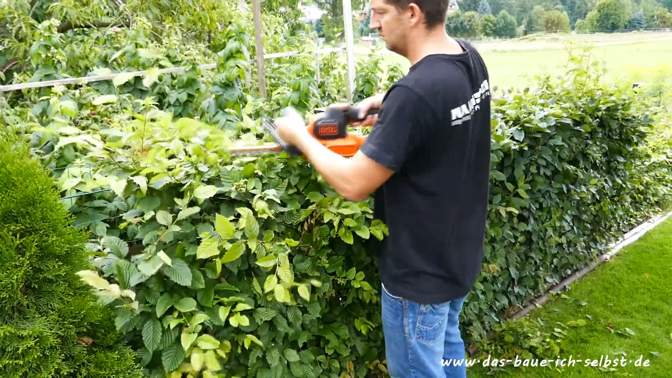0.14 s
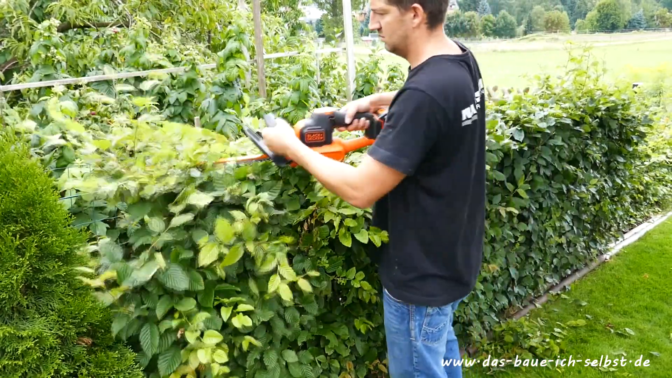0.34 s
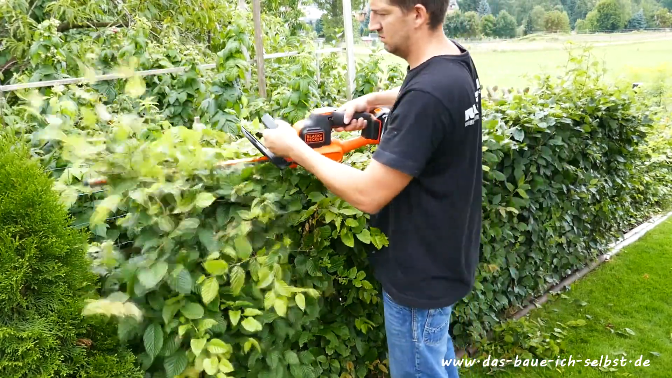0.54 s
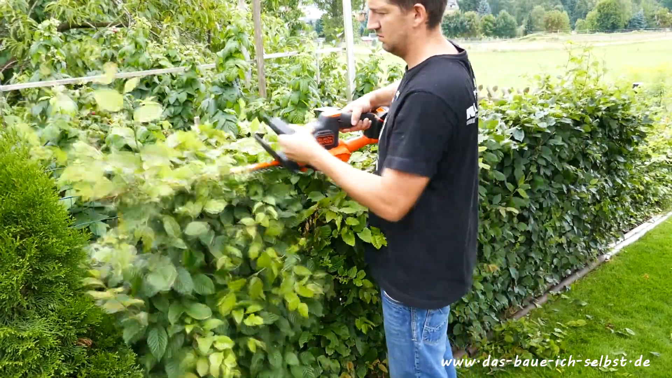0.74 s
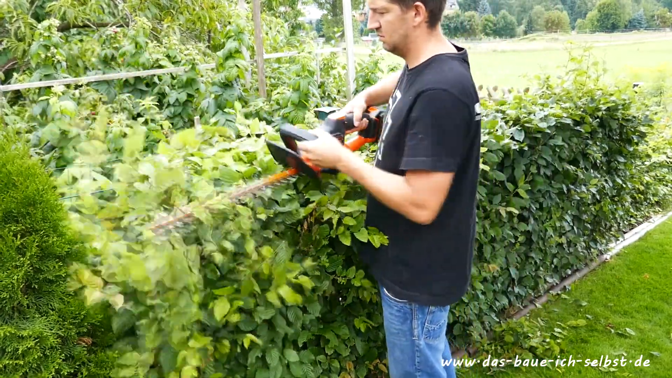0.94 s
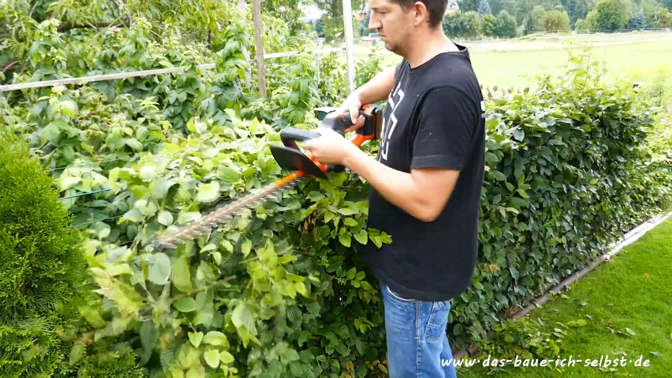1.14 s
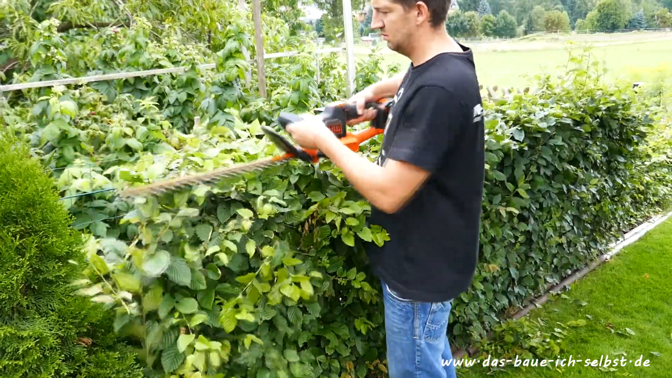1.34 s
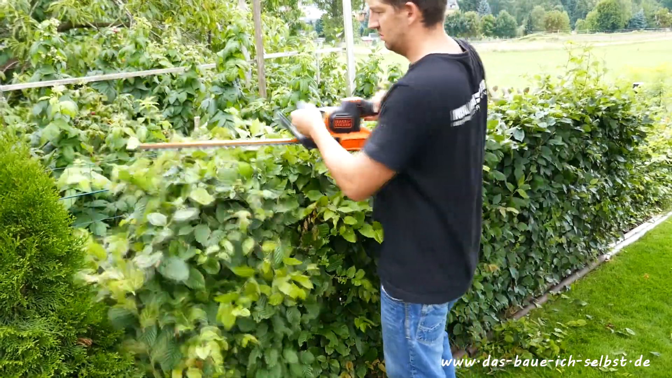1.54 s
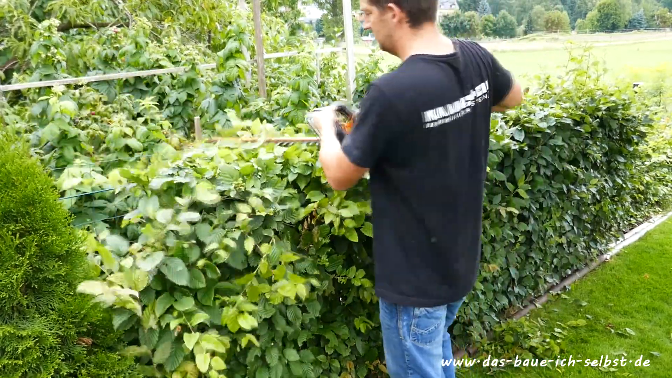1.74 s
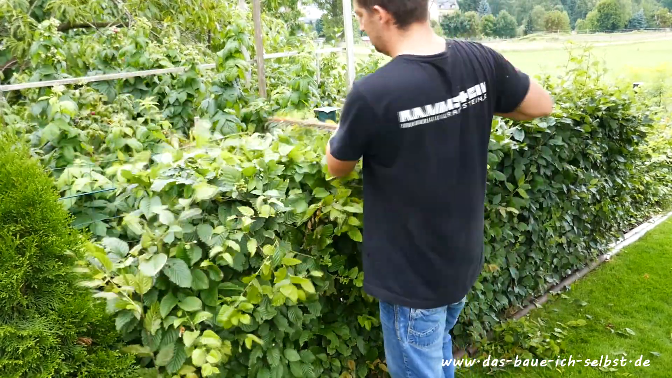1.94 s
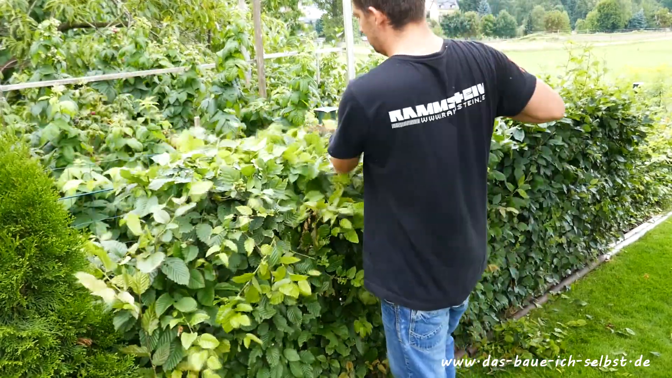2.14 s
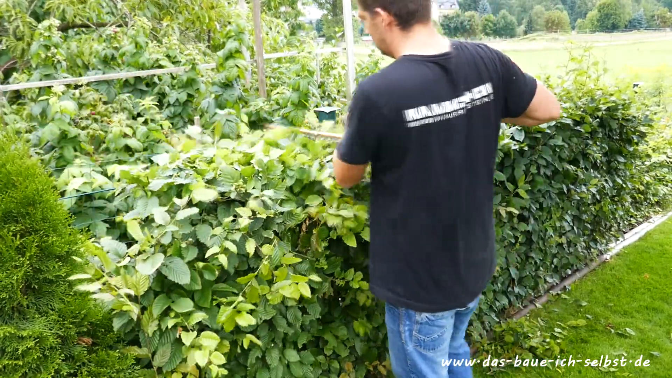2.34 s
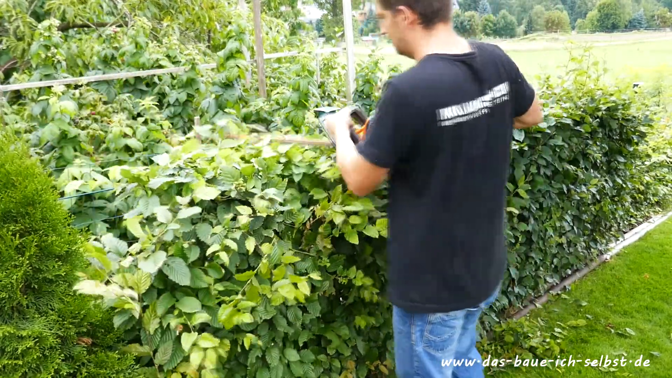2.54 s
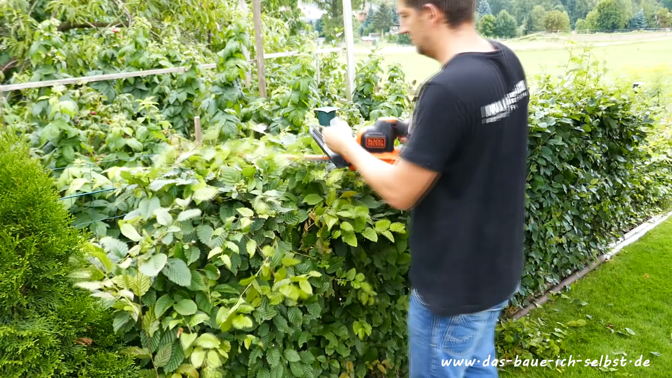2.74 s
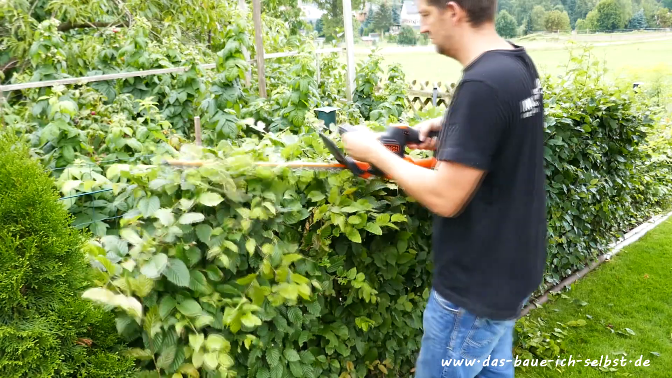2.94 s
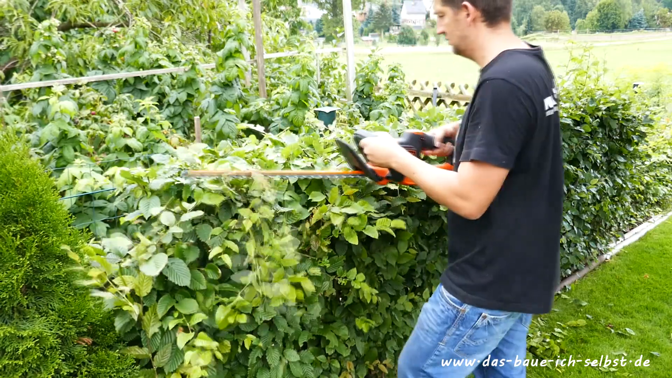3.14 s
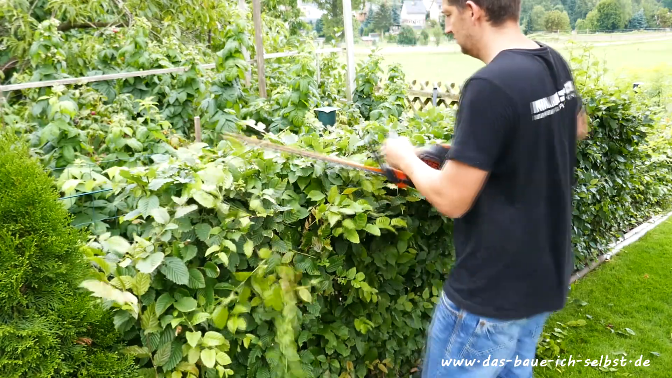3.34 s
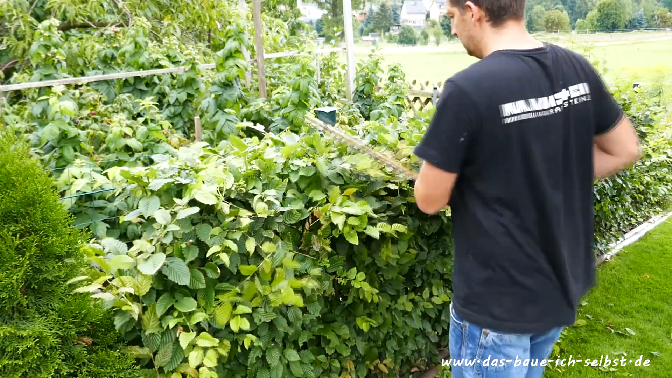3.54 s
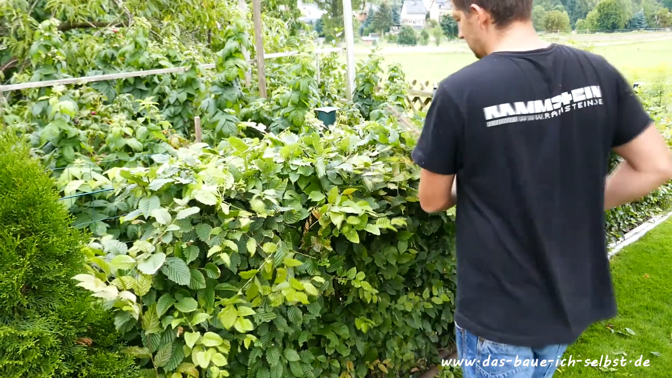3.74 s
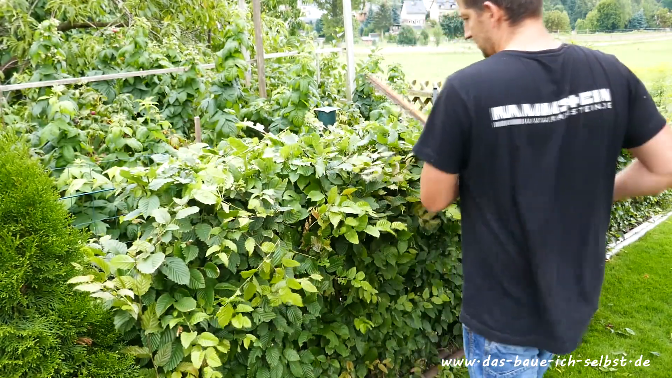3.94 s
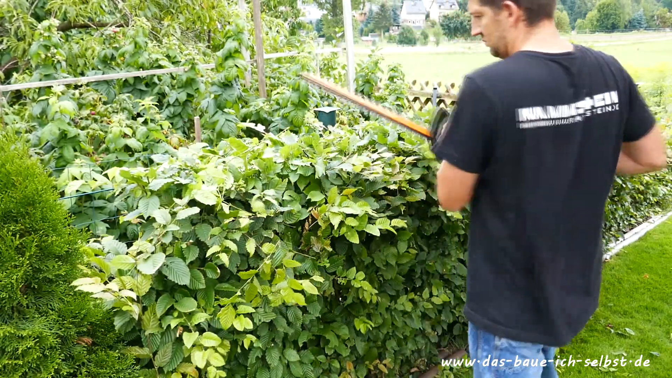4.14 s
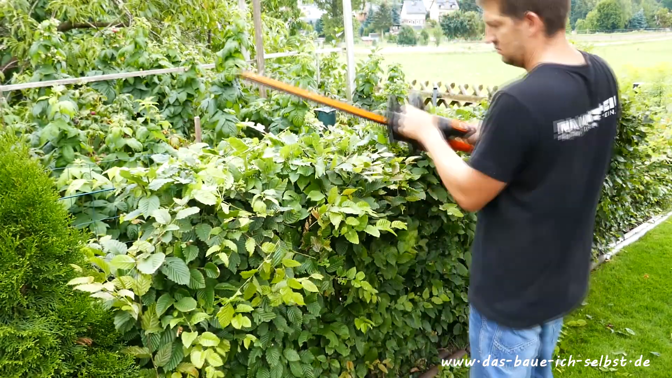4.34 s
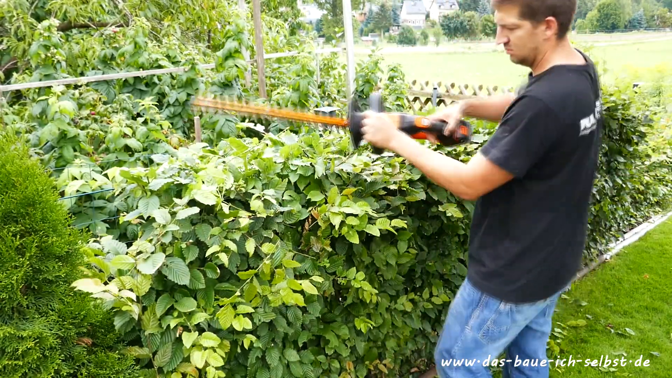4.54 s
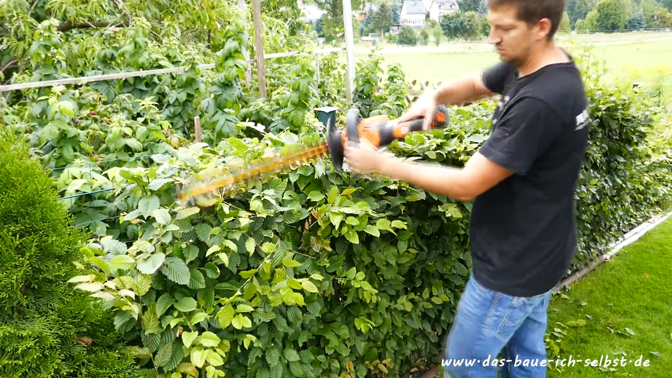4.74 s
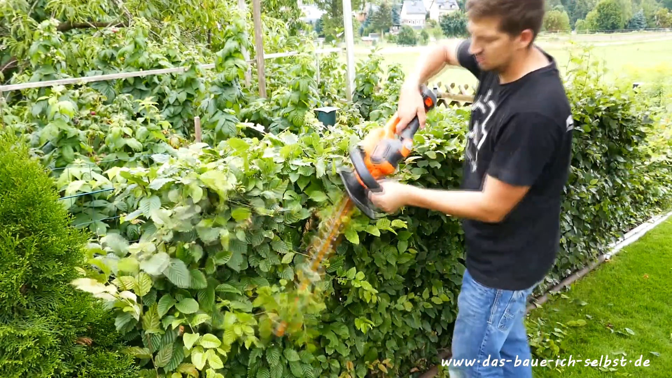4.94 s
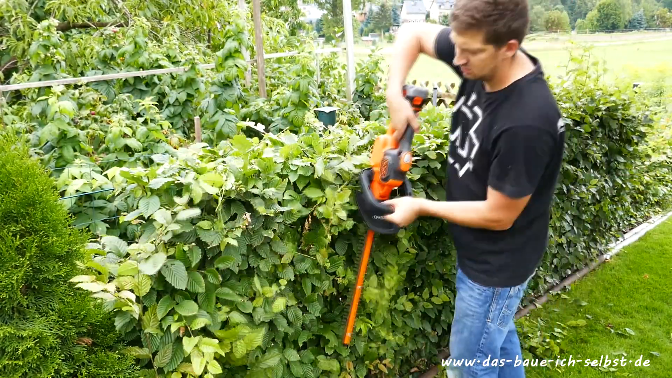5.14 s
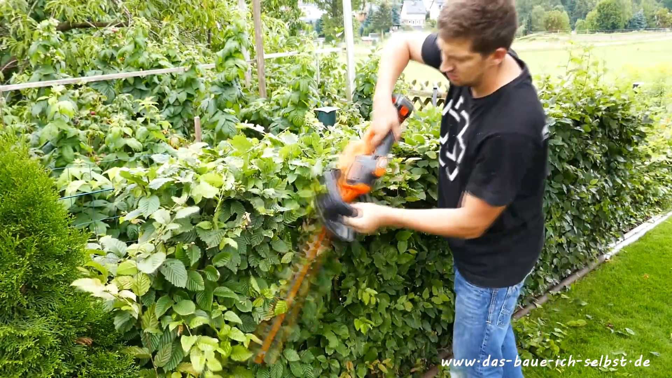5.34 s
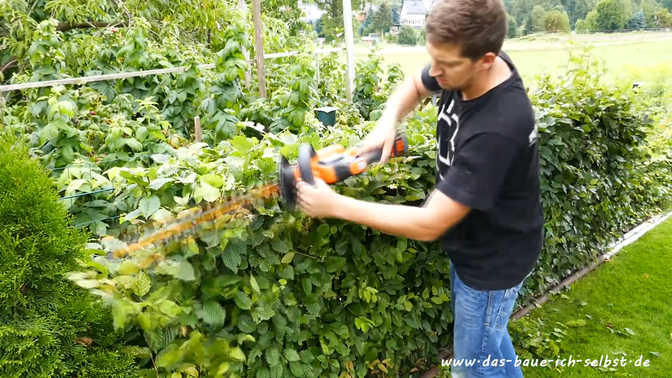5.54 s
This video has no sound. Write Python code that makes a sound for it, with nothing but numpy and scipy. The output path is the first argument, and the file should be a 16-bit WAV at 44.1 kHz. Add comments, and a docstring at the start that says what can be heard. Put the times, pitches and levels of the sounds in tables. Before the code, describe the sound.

A battery hedge trimmer is already running at full speed, close and dry in an open garden. Its reciprocating drive makes a rapid, grainy rattle of hollow plastic and gears, about 46 strokes a second, beneath a bright rasp of steel blades. Speed sags slightly around 0.5-0.8 s as it bites. Low wind thuds bump the microphone at 0.15-0.45 s and again near 0.8 s. Twigs crack and leaves crackle irregularly, with a leafy tear near 2.5 s. Tone shifts as the tool swings; from about 3.5 s it is duller, slowing slightly. At 4.12 s the drive winds down within a tenth of a second, with small clacks, leaving faint air and a distant engine's low drone. After a click near 4.28 s it restarts at 4.31 s with a short, rough, nasal bark, then rattles brightly, with frequent twig snaps and shredding leaves until cut off at about 5.6 s.

```python
"""Hedge trimmer in a garden

A cordless hedge trimmer works along a hedge, stops for a moment and starts again with a bark.
Impacts in the drive excite housing and gears; the steel blades scrape and ring; grain and noise bursts
make the leaves and twigs. The gardener's body shades the tool, echoes and foliage spread the sound,
and filtered noise gives gusts on the microphone and a garden wash with a distant engine."""
import sys
import numpy as np
from scipy import signal
from scipy.fft import rfft, irfft
from scipy.io import wavfile

SR = 44100
rng = np.random.default_rng(int(sys.argv[2]) if len(sys.argv) > 2 else 0)


def unload_audio(sound):
    """Save the sound as a 16-bit wav file, at the path given as the first command line argument."""
    columns = np.transpose(np.atleast_2d(sound))
    # keep every value between -1 and 1, then stretch to whole-number steps
    steps = np.round(np.clip(columns, -1, 1) * 32767)
    wavfile.write(sys.argv[1], SR, steps.astype(np.int16))


N = 246519
TIME = np.arange(N) / SR
PULL_S = 4.312  # the trigger is pulled again

# blade speed with the trigger held; it sags in thick growth and eases off before the stop:
# (time [s], speed [reversals per s])
SPEED = [(0, 46), (.3, 45.6), (.5, 43.6), (.74, 43), (.86, 45.6), (1.2, 46), (1.55, 45.4), (2.0, 46.2),
         (2.5, 46), (2.85, 45.4), (3.15, 46.7), (3.48, 45.7), (3.65, 43.2), (3.88, 43), (3.94, 39.6),
         (4.04, 35.5), (4.13, 35), (4.3, 46)]
# colour of the rattling housing: (frequency [Hz], level [dB per Hz])
HOUSING = [(50, -51), (120, -40.5), (200, -14), (290, -12.5), (355, -1.5), (450, -3.5), (580, -2.5),
           (740, -1.5), (860, 1), (1150, 0.6), (1330, -0.5), (1480, -2.5), (1750, -7.5), (2400, -26.5)]
# colour of the gear clatter: (frequency [Hz], level [dB per Hz])
GEARS = [(100, -70), (1100, -47), (1650, -10), (2000, -3), (2400, 2), (2700, -1), (2950, -6), (3350, -5),
         (3950, -11), (4400, -10), (5000, -11), (5700, -38.5), (8000, -39)]
# colour of the scraping blades: (frequency [Hz], level [dB per Hz])
SCRAPE = [(100, -46), (3800, -31), (5300, 2), (6000, 0), (7100, -3.5), (8400, -0.5), (9900, -0.5),
          (11500, -0.5), (13000, -0.5), (14000, -4.5), (15000, -10), (16000, -6.5)]


def trimmer():
    """A crank drives the blades; play in the drive knocks at each reversal and rattles in between."""
    strokes = np.cumsum(speed()) / SR
    drive = drive_impacts(strokes)
    housing_gain, gears_gain, blades_gain = levels()
    gears = evened(coloured(drive, GEARS))
    body = housing_gain * housing(drive, strokes) + gears_gain * gears
    return body + blades(drive, strokes, blades_gain) + strains(drive) + motor(drive)


def drive_impacts(strokes):
    """Crank knocks, slapping blade teeth and fine grit, pressed harder at one point of each stroke."""
    knocks = impacts(strokes + .06 * wander(40), spread_db=2.5)
    # the outward and the return stroke knock with unequal force
    knocks = knocks * (1 + 0.21 * np.cos(np.pi * strokes))
    # the teeth slap past each other several times a stroke, never quite in step
    teeth = impacts(8 * strokes + .35 * wander(50), spread_db=1.15)
    load = gain_of(0.24 * np.cos(2 * np.pi * (strokes - .08)))
    crank = 0.32 * chatter(knocks, decay_s=0.0082)
    slaps = 0.7 * chatter(teeth, decay_s=0.0018)
    grit = 0.58 * grains(6500, spread_db=1.0)
    return load * evened(crank + slaps + grit)


def housing(drive, strokes, stuck_pace=.62):
    """The drive shakes the plastic housing; below stuck_pace of full speed its rattle fades away."""
    shaken = evened(coloured(drive, HOUSING))
    freedom = np.minimum(pace() / stuck_pace, 1) ** .5
    return evened(shaken + rattle(strokes)) * freedom


def rattle(strokes, bounces_per_stroke=3.6, loose_turns=.4, level_db=-7.5, flex_s=0.00029):
    """Loose parts bounce unevenly against the shell, whose modes bend a little as the grip flexes it."""
    # narrow modes of the plastic shell: (frequency [Hz], width of the first pass [Hz], level [dB])
    shell_modes = [(392, 27, -7.5), (462, 30, -4), (509, 45, -7.5), (631, 31, -4.5), (830, 60, -3),
                   (950, 34, -3), (1090, 56, -5), (1205, 54, -0.5), (1429, 44, -1), (2440, 110, -0.5),
                   (2665, 97, -1.5)]
    hits = impacts(bounces_per_stroke * strokes + loose_turns * wander(70), spread_db=2.5)
    hits = hits * rng.choice([-1, 1], N)
    shell = np.zeros(N)
    for hz, width, db in shell_modes:
        shell += gain_of(db) * ring(ring(hits, hz, width), hz, hz / 2)
    return gain_of(level_db) * np.interp(TIME - flex_s * wander(3), TIME, evened(shell))


def blades(drive, strokes, gain, waver_db=2.5):
    """Steel slides over steel and through foliage in uneven bites; the rubbing also makes it ring."""
    # ringing of the steel: (frequency [Hz], decay by 60 dB [s], mean level before a shared trim [dB])
    steel_modes = [(4380, .009, -7), (4900, .012, -9.5), (6266, .03, -22), (7631, .04, -22),
                   (7900, .02, -18), (9910, .012, -14), (10621, .025, -14), (10830, .02, -18),
                   (13599, .022, -15), (13850, .012, -18), (14836, .03, -19)]
    bites = gain_of(wander(27) + np.cos(2 * np.pi * strokes))  # about 1 dB each
    fine = 1.2 * grains(6000, spread_db=2.5)
    coarse = 0.49 * chatter(grains(120, spread_db=0), decay_s=0.0031)
    rub = bites * evened(0.42 * drive + fine + coarse)
    steel = np.zeros(N)
    for hz, t60, db in steel_modes:
        width = np.log(1000) / np.pi / t60
        steel += gain_of(db + waver_db * wander(8.0)) * ring(gain * rub, hz, width)
    return gain * evened(coloured(rub, SCRAPE)) + gain_of(-3.0) * np.std(gain * rub) * steel


def strains(drive):
    """As load and grip shift, one resonance or another of housing, gears or blades sings out."""
    # singing resonances: (time [s], length [s], frequency [Hz], half the width of each pass [Hz], level [dB])
    singing = [(-.05, 0.24, 1500, 45, -43), (.295, .04, 380, 60, -38), (0.098, 0.44, 2560, 220, -51.5),
               (0.575, 0.32, 2340, 260, -45.5), (.85, 0.37, 3380, 80, -54), (.9, .55, 4300, 130, -59),
               (.95, 0.49, 2560, 240, -49), (2.173, 0.14, 4330, 100.2, -57), (2.58, 0.16, 890, 61, -55),
               (2.87, 0.095, 1410, 45, -44), (3.1, .38, 2690, 130, -48), (3.54, 0.18, 3360, 80, -49.5),
               (3.78, 0.28, 488, 40, -56), (4.383, 0.055, 2260, 160, -37), (4.45, 0.55, 833, 69.6, -49.5),
               (4.52, .38, 1180, 60, -49), (5.0, 0.5, 1096, 50, -46.5), (5.03, 0.44, 2500, 260, -45),
               (2.02, .2, 14880, 110, -60), (1.95, .25, 10660, 130, -59), (2.37, .25, 13870, 200, -55),
               (3.25, 0.44, 10610, 80, -57), (3.3, .42, 14850, 80, -62), (4.48, .38, 13600, 100, -55)]
    out = np.zeros(N)
    for s, length, hz, half_width, db in singing:
        out += gain_of(db) * swell(s, length) * ring_twice(drive, hz, half_width * 2)
    return out


def motor(drive, hum_cycles_per_stroke=7.6):
    """The rotor's wavering hum and the low thrum of the rattling drive, both following the speed."""
    # lows bending round the gardener as the tool is turned, at full speed:
    # (time [s], hum level [dB], thrum level [dB])
    aim = [(0, -54, -56), (.3, -43, -52.5), (.7, -50, -54), (1.051, -47.5, -62.5), (1.8, -56, -56.5),
           (2.3, -52, -54.5), (2.88, -42, -52.5), (3.1, -51.5, -59.5), (3.401, -53, -59), (3.6, -56, -54.5),
           (3.85, -54, -56), (3.94, -43, -54), (4.04, -57, -51), (4.4, -62, -69), (4.6, -52, -65),
           (5.6, -52.5, -62)]
    # colour of the thrum: (frequency [Hz], level [dB per Hz])
    thrum_colour = [(70, -30.5), (130, -19), (180, 1), (260, 3), (330, -6.5), (480, -14), (900, -63)]
    s, hum_db, thrum_db = np.transpose(aim)
    hum_gain = gain_of(np.interp(TIME, s, hum_db))
    thrum_gain = gain_of(np.interp(TIME, s, thrum_db))
    turns = np.cumsum(hum_cycles_per_stroke * speed()) / SR + .025 * wander(10)
    hum = evened(np.cos(2 * np.pi * turns) * (1 + .25 * wander(6)))
    thrum = evened(coloured(drive, thrum_colour))
    return pace() ** 2 * (hum_gain * hum + thrum_gain * thrum)


def speed(release_s=4.123, coast_s=.042, stall_s=.11, spin_up_s=.011):
    """Reversals per second: the drive coasts when the trigger is let go and spins up fast when pulled."""
    since = np.maximum(TIME - release_s, 0)
    friction = np.maximum(1 - (since / stall_s) ** 3, 0)  # dead stop stall_s after the release
    coasting = np.exp(-since / coast_s) * friction
    spinning_up = 1 - np.exp(-np.maximum(TIME - PULL_S, 0) / spin_up_s)
    return np.interp(TIME, *np.transpose(SPEED)) * np.maximum(coasting, spinning_up)


def pace():
    """Speed as a share of full speed."""
    return speed() / SPEED[0][1]


def load_db(ease_s=0.017):
    """How hard the hedge makes the drive work; each load builds up and lets go within ease_s."""
    # sweeps through the hedge: (start [s], length [s], load [dB])
    sweeps = [(0.09, 0.46, 1), (0.943, 0.48, 1), (2.69, 0.2, 2), (3.04, 0.34, 0.1), (4.277, 0.23, 1.5),
              (5.024, 0.53, 0.5)]
    return sum(db * plateau(s, ease_s, length - 2 * ease_s, ease_s) for s, length, db in sweeps)


def levels():
    """Gains of housing, gears and blades, following speed, load and whatever shades the tool."""
    # housing, gears, blades running free at full speed:
    # (level [dB], power of speed [1], share of the load [1], sharpness of the shadow [1])
    parts = {"housing": (-36, 0.34, 1, 1), "gears": (-37, 1.34, 1., 1.5), "blades": (-43.5, 2.5, 1.04, 0.5)}
    # the tool passes behind foliage or the gardener: (start [s], going in [s], hidden [s],
    # coming out [s], housing change [dB], gears change [dB], blades change [dB])
    shadows = [(.4, 0.71, 0.042, 0.063, -1.5, 0, -0.8), (1.35, .65, 0.14, 0.5, -4, -4, -0.5),
               (1.93, 0.036, 0.27, 0.071, 0.5, -1.8, -2.3), (3.43, 0.15, 0.59, 0.33, -5, -1, 0.5)]
    load, gains = load_db(), []
    for part, (db, power, share, sharpness) in enumerate(parts.values()):
        shade = np.zeros(N)
        for s, going, hidden, coming, *changes_db in shadows:
            shade += changes_db[part] * plateau(s, going, hidden, coming) ** sharpness
        gains.append(pace() ** power * gain_of(db + share * load + shade))
    return gains


def squawk(hz=868, width_hz=16, rough=0.5, throb=0.4, level_db=-36.5,
           lag_s=0.0054, rise_s=0.019, hold_s=.022, fade_s=0.12,
           upper_hz=1130, upper_width_hz=170, upper_db=-3):
    """As the drive grabs, the blades stick and slip: a rough bark at each stroke, a looser tone above."""
    turns = np.cumsum(hz + width_hz * wander(123)) / SR
    strokes = np.cumsum(speed() * (TIME > PULL_S)) / SR
    throbbing = 1 + throb * np.cos(2 * np.pi * strokes)
    tone = evened(np.cos(2 * np.pi * turns) * (1 + rough * wander(160)) * throbbing)
    upper = ring_twice(rng.standard_normal(N), upper_hz, upper_width_hz)
    envelope = plateau(PULL_S + lag_s, rise_s, hold_s, fade_s)
    return gain_of(level_db) * envelope * (tone + gain_of(upper_db) * upper)


def clacks(decay_s=0.0037):
    """Small knocks of the tool coming to rest and switched on again: resonant noise that dies at once."""
    # last clacks of the stopping drive, then the grip and the trigger:
    # (time [s], starting level [dB], frequency [Hz], half the width of each pass [Hz])
    knocks = [(4.147, -54, 2400, 1500), (4.1865, -49, 2500, 2200), (4.254, -67, 2000, 6000),
              (4.2755, -47, 1240, 300), (4.291, -62, 1350, 500)]
    out = np.zeros(N)
    for s, db, hz, half_width in knocks:
        dying = (TIME > s) * np.exp(-abs(TIME - s) / decay_s)
        out += gain_of(db) * dying * ring_twice(rng.standard_normal(N), hz, 2 * half_width)
    return out


def twigs(snap_s=0.0043, splinter_s=0.02, splinter_db=-10,
          thin_per_s=6, thin_db=6, thin_spread_db=1.5, thin_treble_db=-4):
    """A twig gives way with a crack and a short splintering that jolts the gears, housing and blades."""
    # thick twigs cut through: (time [s], burst level before colouring [dB], extra on the scrape feed [dB])
    thick = [(.111, -30, 5), (0.2962, -25, -17), (0.5533, -27, 0), (0.644, -30, 4), (0.668, -28, -2),
             (1.189, -25, -14), (1.374, -29, -14), (1.488, -25.5, -7), (1.756, -29, -10), (1.917, -32, -4),
             (2.2438, -25.5, -16), (2.2647, -27, -20), (2.492, -27.5, 3), (3.5593, -28.5, -1),
             (4.123, -33, -18), (4.34, -28, -11.5), (4.401, -27, -2), (4.4188, -24.5, -5), (4.509, -31, -2),
             (4.569, -29, 3.5), (4.7282, -25.5, -17), (4.7857, -26, -8), (4.8733, -25, -11),
             (4.9825, -29, -5), (5.091, -24.5, -16), (5.1167, -39, -6), (5.1301, -23.5, -19),
             (5.26, -25.5, -14), (5.4364, -25.5, -6)]
    t, jolt, crack = np.arange(SR // 20) / SR, np.zeros(N), np.zeros(N)
    shape = np.exp(-t / snap_s) + gain_of(splinter_db) * np.exp(-t / splinter_s)
    # thin twigs snap by chance; their level follows the gears, so none is heard while the blades stand
    gears_db = 20 * np.log10(levels()[1] + 1e-9)
    snap_db = gears_db + thin_db + thin_spread_db * rng.standard_normal(N)
    moments = np.flatnonzero(rng.random(N) < thin_per_s / SR)
    thin = [(TIME[i], snap_db[i], thin_treble_db) for i in moments]
    for s, db, treble_db in thick + thin:
        burst = gain_of(db) * shape * rng.standard_normal(len(t))
        add(jolt, s, burst)
        add(crack, s, gain_of(treble_db) * burst)
    body = gain_of(6.0) * coloured(jolt, GEARS) + gain_of(-0.5) * coloured(jolt, HOUSING)
    return body + gain_of(-7.5) * coloured(crack, SCRAPE)


def leaves():
    """Bunches of leaves tear in a dense bright crackle."""
    # shredded bunches: (time [s], length [s], level [dB])
    bunches = [(0.537, 0.029, -46), (0.772, 0.022, -42), (1.89, 0.066, -45.5), (2.443, 0.22, -45.5),
               (3.604, 0.061, -42.5), (4.4, 0.16, -43.5), (4.503, 0.39, -47)]
    tearing = sum(gain_of(db) * swell(s, length) for s, length, db in bunches)
    crackle = grains(3000, spread_db=2)
    return tearing * evened(coloured(crackle, SCRAPE))


def outdoors(x, sway_s=0.0003975, count=12):
    """Echoes shift as the tool is swung; swaying foliage scatters some sound to the sides."""
    # gardener's body, lawn and fence: (delay [s], level before colouring [dB])
    reflections = [(.0017, -12.5), (.0042, -14), (.0075, -18), (.013, -20)]
    # colour of the scattered side signal before its trim: (frequency [Hz], level [dB])
    scatter_colour = [(200, -32), (700, -18), (1290, -15), (2400, -18.5), (3500, -37), (5000, -10),
                      (7000, -0.5), (9000, -6), (15000, -8.5)]
    echoes = np.zeros(N)
    for delay, db in reflections:
        echoes += gain_of(db) * np.interp(TIME - delay - sway_s * wander(0.842), TIME, x)
    middle = x + coloured(echoes, [(3000, 1.0), (12000, -1.3)])
    foliage = np.zeros(N)
    for delay in rng.uniform(0.001067, .009, count):
        foliage += np.interp(TIME - delay - sway_s * wander(0.82), TIME, x)
    side = gain_of(.5) * coloured(foliage / np.sqrt(count), scatter_colour)
    return np.array([middle + side, middle - side])


def wind(alike=0.31, rise_s=0.025):
    """Gusts swell quickly and die away: a lumpy rumble, only partly alike at the two microphone ports."""
    # gusts: (peak time [s], level before the port weights [dB], dying time [s])
    gusts = [(.17, -56, 0.04), (.28, -53, 0.045), (.4, -53, 0.066), (.8, -59, 0.05)]
    # colour of the rumble: (frequency [Hz], level [dB per Hz])
    wind_colour = [(20, -27), (50, -15.5), (90, 1), (135, 4), (190, -3), (300, -7), (600, -53)]
    strength = np.zeros(N)
    for s, db, dying in gusts:
        strength += gain_of(db) * np.exp(-np.maximum((s - TIME) / rise_s, (TIME - s) / dying))
    shared, left, right = (evened(coloured(rng.standard_normal(N), wind_colour)) for _ in range(3))
    return strength * (alike * shared + np.array([1.7 * left, 1.25 * right]))


def buffets(leak=0.1):
    """An eddy hits one microphone port with a short low thud; little of it reaches the other."""
    # eddies: (time [s], peak level [dB], frequency [Hz], half length [s], port [0 left, 1 right])
    eddies = [(.152, -44, 140, .004, 0), (.353, -40, 140, .005, 1), (.374, -31, 160, 0.0052, 0),
              (.381, -38, 135, .007, 0), (.399, -39, 115, .018, 1), (.429, -45, 140, .011, 1),
              (.455, -45, 125, .011, 0), (.794, -38, 140, 0.0035, 0), (.8645, -46, 153, .004, 0),
              (.8865, -47, 120, .004, 0)]
    out = np.zeros((2, N))
    for s, db, hz, half, port in eddies:
        envelope = gain_of(db) * np.exp(-((TIME - s) / half) ** 2)
        thud = envelope * np.cos(2 * np.pi * hz * (TIME - s))
        out += np.outer([leak, 1] if port == 1 else [1, leak], thud)
    return out


def garden(rumble_hz=98, rumble_width_hz=45, rumble_db=-9.0):
    """Noise for the low wash of open air; wavering tones and a low rumble for a distant engine."""
    # colour of the wash: (frequency [Hz], level [dB per Hz])
    wash_colour = [(20, -23), (50, -20), (75, -6), (98, -1.5), (135, -10), (180, 3), (260, 0.5), (450, 0.5),
                   (1200, -6.5), (2500, -6), (5000, -16), (8000, -28), (16000, -28)]
    # lines of the engine against each other: (frequency [Hz], level [dB])
    engine_lines = [(108, -9), (183, -3), (228, -1), (273, 0.5)]
    # gain of the whole engine as it swells: (time [s], level [dB])
    engine_swell = [(1.2, -70), (2.3, -70), (3.2, -69), (3.9, -65), (4.25, -62.5), (4.6, -70), (5.6, -69.5)]
    shared, left, right = (evened(coloured(rng.standard_normal(N), wash_colour)) for _ in range(3))
    wash = gain_of(-59.0) * (0.8 * shared + np.array([left, right]))
    drone = np.zeros(N)
    for hz, db in engine_lines:
        tone = np.cos(2 * np.pi * (hz * TIME + .17 * wander(5)))
        drone += gain_of(db) * evened(tone * (1 + .55 * wander(10)))
    # the exhaust
    rumble = gain_of(rumble_db) * ring_twice(rng.standard_normal(N), rumble_hz, rumble_width_hz)
    return wash + gain_of(np.interp(TIME, *np.transpose(engine_swell))) * (drone + rumble)


def gain_of(db):
    """Decibels to amplitude."""
    return 10 ** (np.asarray(db) / 20)


def evened(x):
    """Scales to rms 1."""
    return x / np.sqrt(np.mean(x ** 2) + 1e-20)


def add(mix, s, sound):
    """Mixes a sound in at time s."""
    part = mix[max(round(s * SR), 0):][:len(sound)]
    part += sound[:len(part)]


def wander(rate_hz):
    """Random drift of rms 1, slower than about rate_hz."""
    hz = np.fft.rfftfreq(N, 1 / SR)
    return evened(irfft(rfft(rng.standard_normal(N)) / (1 + (hz / rate_hz) ** 4), N))


def coloured(x, spectrum, size=4096):
    """Minimum-phase filter with the given (Hz, dB) curve: clicks start sharply and ring out."""
    hz, db = np.transpose(spectrum)
    bins_hz = abs(np.fft.fftfreq(size, 1 / SR))
    curve_db = np.interp(np.log(bins_hz + 1), np.log(hz + 1), db)
    log_gain = np.log(gain_of(curve_db))
    response = np.fft.ifft(np.exp(np.conj(signal.hilbert(log_gain)))).real
    return signal.oaconvolve(x, response[:size // 2])[:N]


def ring(x, hz, width):
    """One resonance of the given width in Hz, at rms 1."""
    r = np.exp(-np.pi * width / SR)
    return evened(signal.lfilter([1, 0, -1], [1, -2 * r * np.cos(2 * np.pi * hz / SR), r * r], x))


def ring_twice(x, hz, width):
    """The same resonance passed twice, for steeper skirts."""
    return ring(ring(x, hz, width), hz, width)


def swell(s, length):
    """A rounded rise and fall."""
    return np.sqrt(np.maximum(np.sin(np.pi * np.clip((TIME - s) / length, 0, 1)), 0))


def plateau(s, attack, hold, release):
    """Rises from 0 to 1, holds and falls back."""
    falling = 1 + (s + attack + hold - TIME) / release
    return np.clip(np.minimum((TIME - s) / attack, falling), 0, 1)


def impacts(turns, spread_db):
    """One click of chance size at each whole turn, at rms 1."""
    size = gain_of(spread_db * np.clip(rng.standard_normal(N), -2, 2))
    whole = np.floor(turns)
    return evened((np.diff(whole, prepend=whole[0]) > 0) * size)


def chatter(clicks, decay_s):
    """Each impact breaks up into a short dying burst of tiny contacts."""
    power = signal.lfilter([1], [1, -np.exp(-2 / (decay_s * SR))], clicks ** 2)
    return evened(np.sqrt(power + 1e-12) * rng.standard_normal(N))


def grains(per_s, spread_db):
    """Clicks at chance moments; with a spread, most are small and a few large."""
    size = gain_of(spread_db * np.minimum(rng.exponential(1, N), 3))
    return evened((rng.random(N) < per_s / SR) * size * rng.choice([-1, 1], N))


def scene():
    """The trimmer and its cuttings in the garden."""
    work = trimmer() + squawk() + twigs() + leaves() + clacks()
    return outdoors(work) + wind() + buffets() + garden()


def record(dry, edge_hz=15950):
    """A steep low-pass limits the band."""
    low_pass = signal.firwin(511, edge_hz, window=("kaiser", 9), fs=SR)
    return signal.oaconvolve(dry, low_pass[None], "same")


dry = scene()
out = record(dry)
unload_audio(out)
```